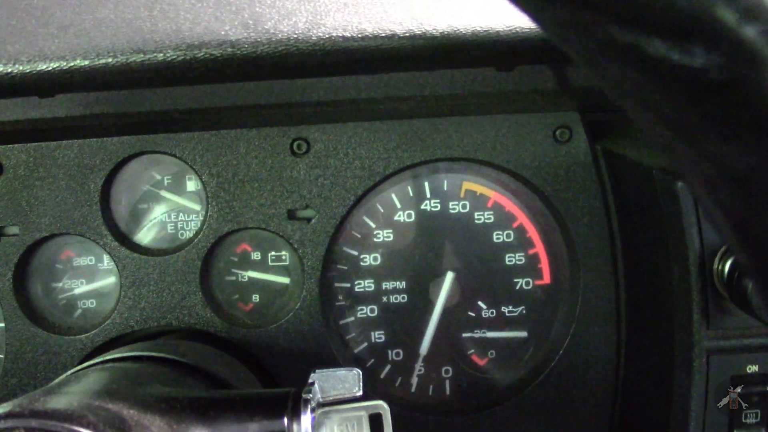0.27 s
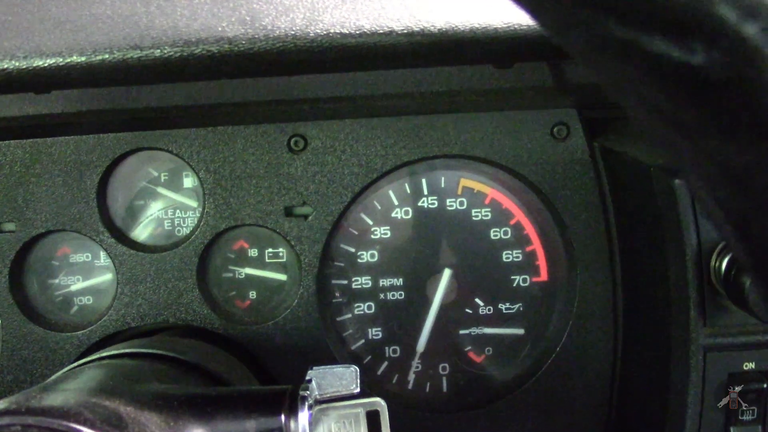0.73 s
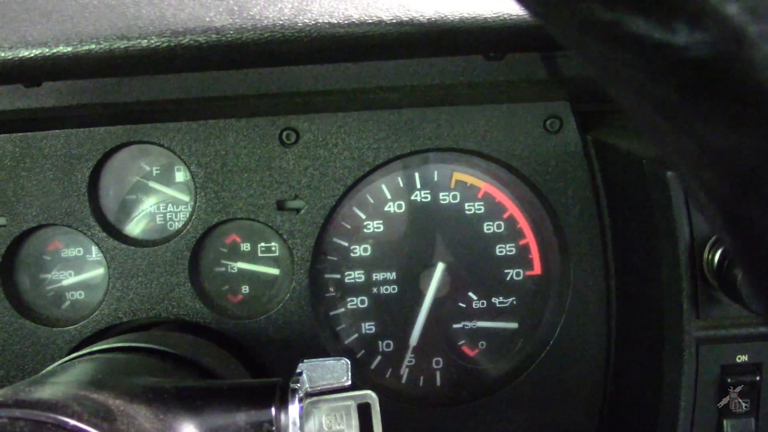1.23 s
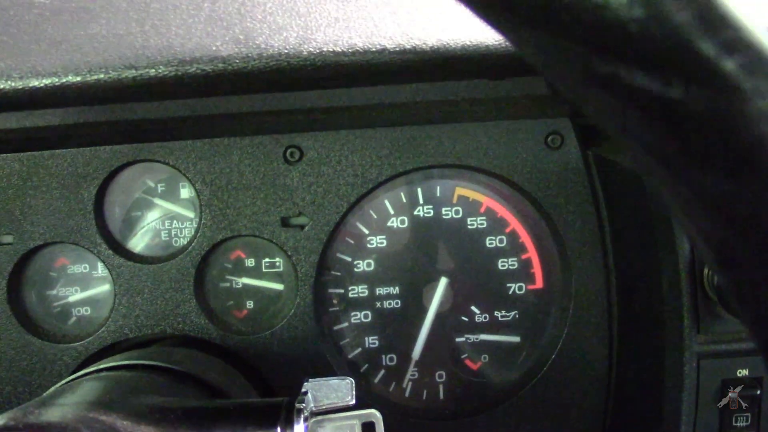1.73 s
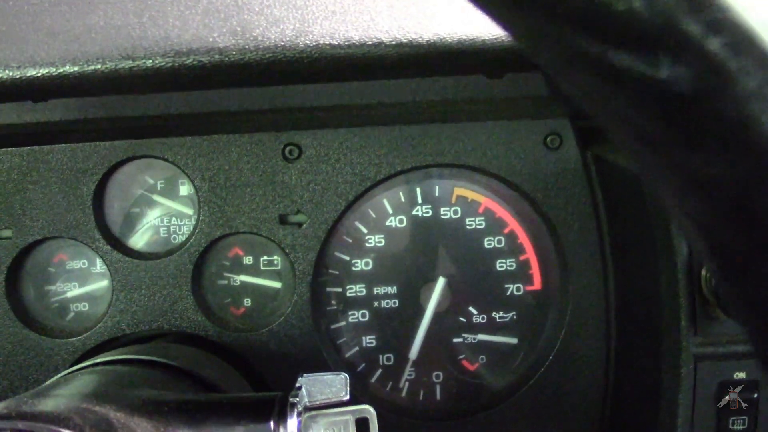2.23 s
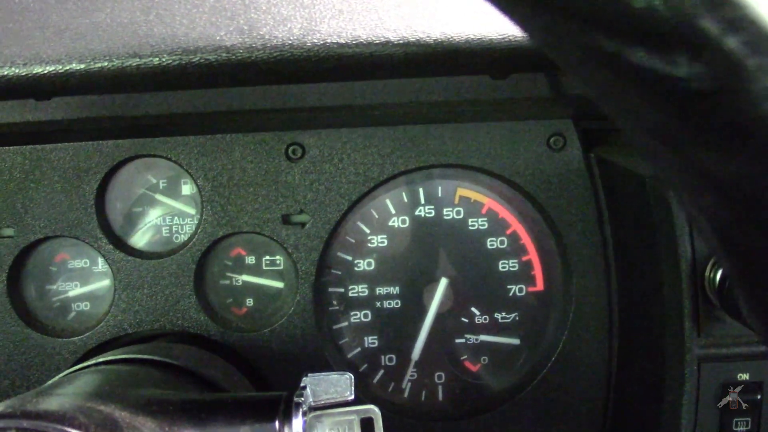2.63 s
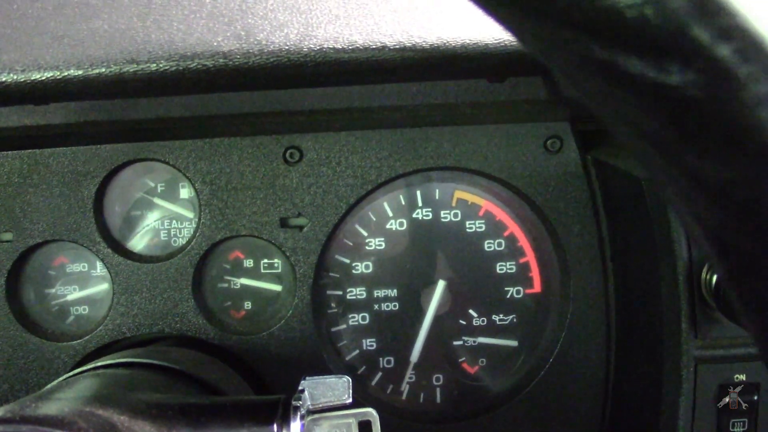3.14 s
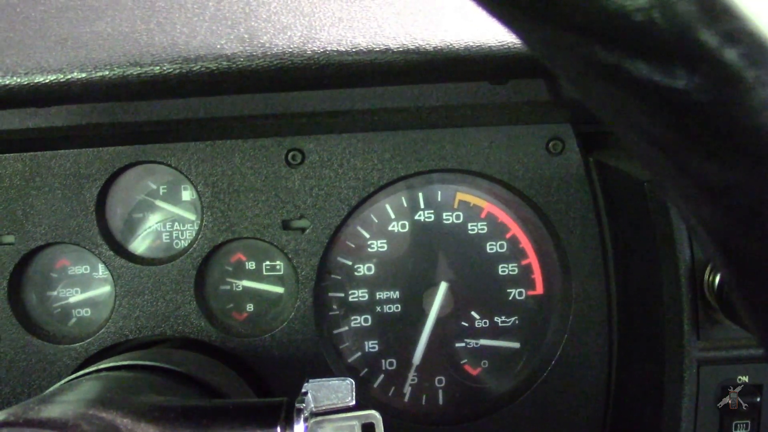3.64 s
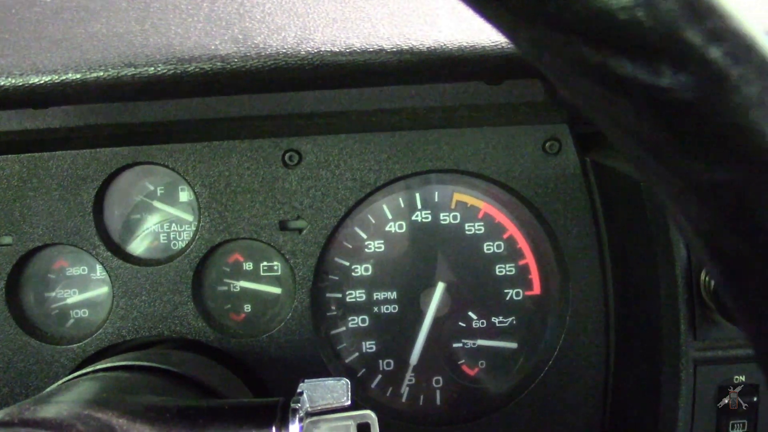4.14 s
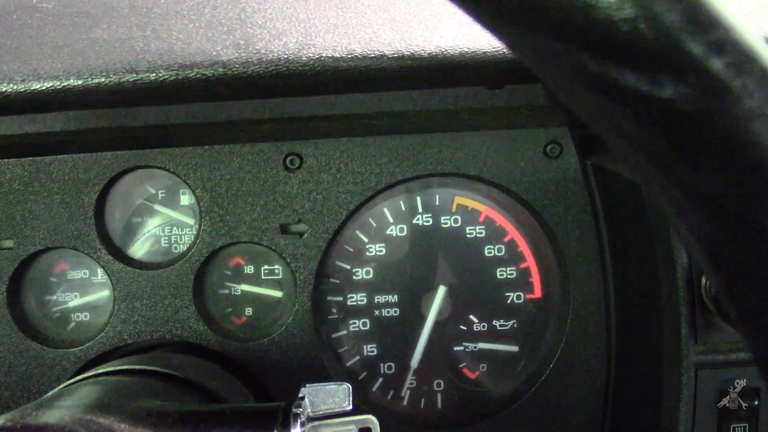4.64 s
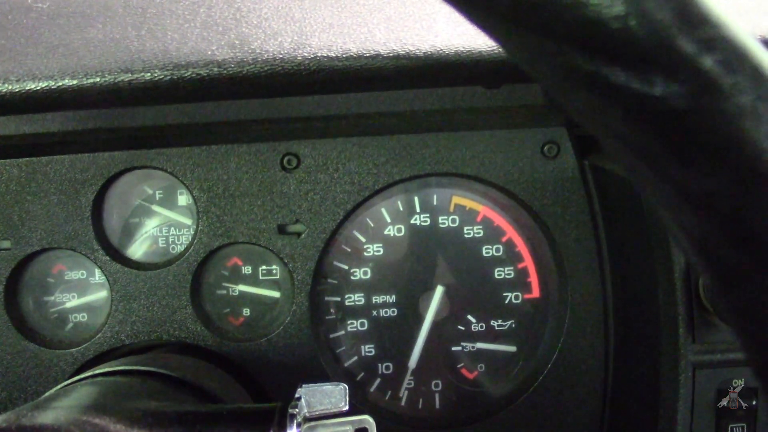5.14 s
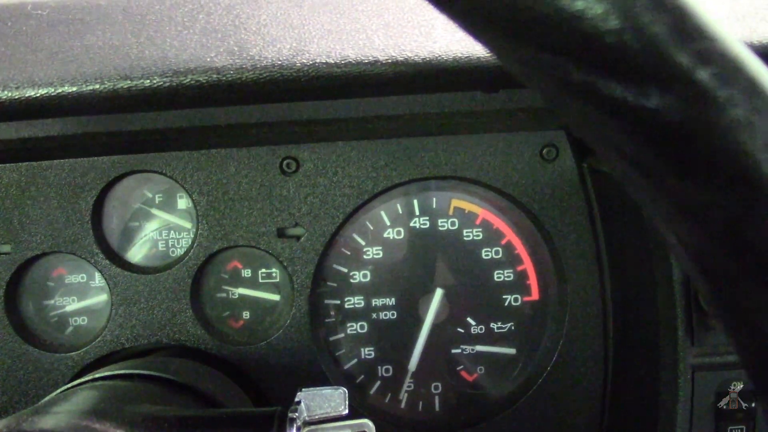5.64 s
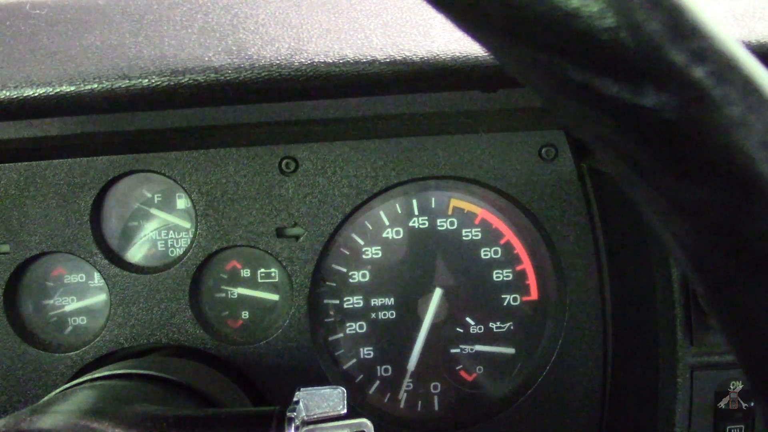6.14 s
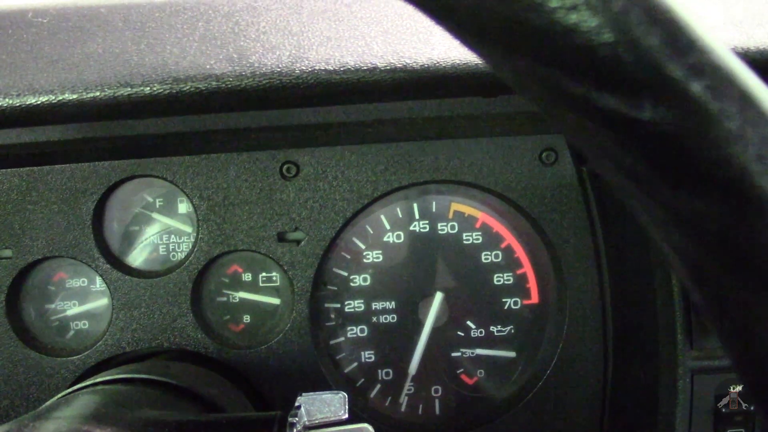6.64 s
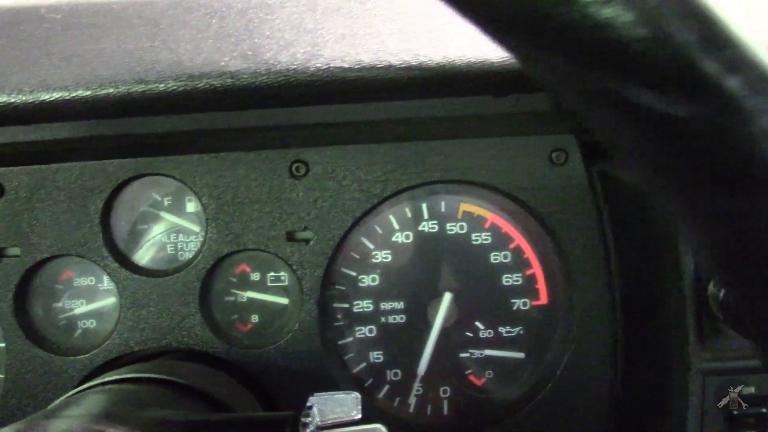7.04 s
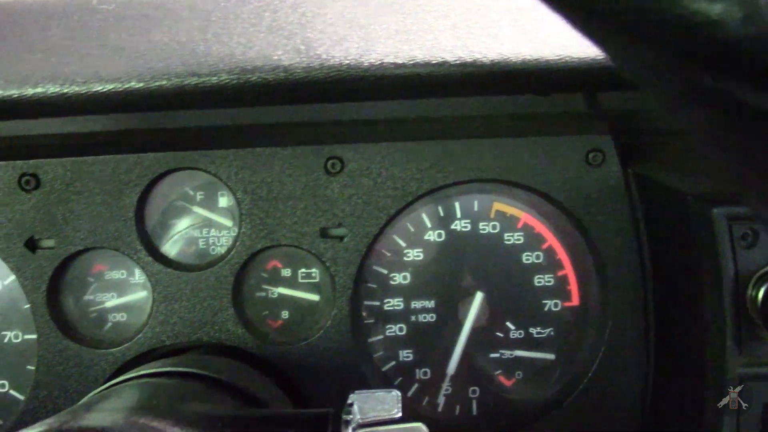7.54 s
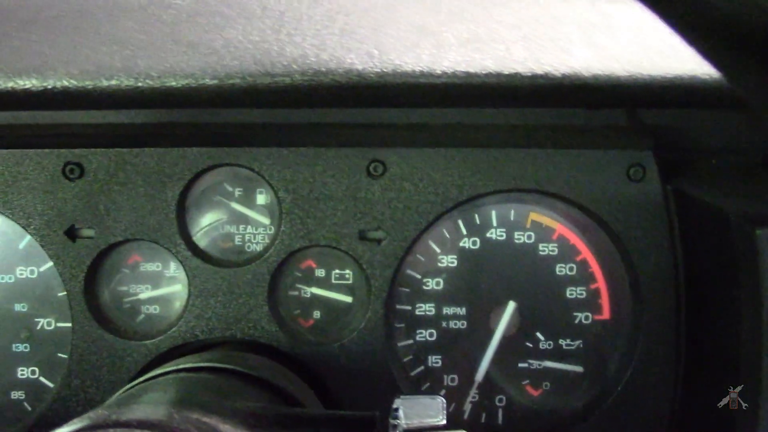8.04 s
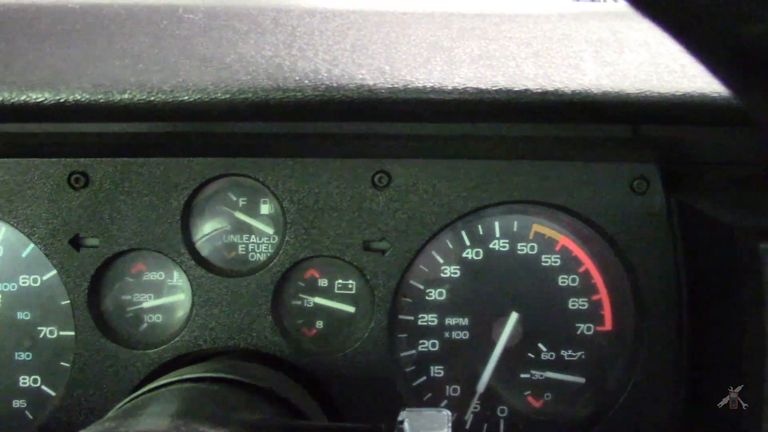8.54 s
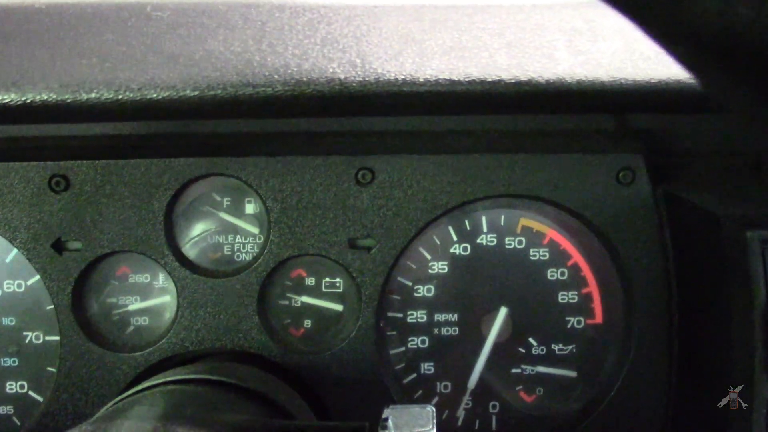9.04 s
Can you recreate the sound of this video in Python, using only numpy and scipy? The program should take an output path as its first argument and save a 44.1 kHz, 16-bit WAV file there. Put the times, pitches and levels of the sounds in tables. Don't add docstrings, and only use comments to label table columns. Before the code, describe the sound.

Inside a parked car, a big V8 idles with a deep, uneven burble and boomy cabin resonance, growing louder over the first few seconds. Around one second a lever scrapes and bangs in a rapid double cluster of hollow knocks. Afterwards the idle wanders slightly, with muffled hiss, faint whine and rasp. Small motor ticks and hand rubs sound close to the little stereo microphone.

```python
import sys
import numpy as np
from scipy import signal
from scipy.fft import rfft, irfft
from scipy.io import wavfile
from scipy.ndimage import uniform_filter1d

SR = 44100
rng = np.random.default_rng(int(sys.argv[2]) if len(sys.argv) > 2 else 0)


def voltage_ratio(decibels):
    exponent = np.asarray(decibels, float) / 20
    return 10 ** exponent


def wrap_up_sound(samples):
    columns = np.atleast_2d(samples).T
    tamed = np.clip(columns, -1, 1)
    steps = np.round(tamed * 32767).astype(np.int16)
    wavfile.write(sys.argv[1], SR, steps)


N = 409248

# time in seconds, firings per second, exhaust level in dB with the gain creep.
IDLE = [(0.0, 39.46, -28.2), (0.5, 38.19, -26.4), (0.72, 39.76, -26.0), (1.87, 42.35, -21.8),
        (2.24, 40.93, -21.1), (2.54, 40.67, -21.3), (3.18, 38.07, -20.1), (3.96, 38.76, -17.9),
        (4.42, 40.91, -17.8), (5.53, 40.08, -18.2), (5.88, 37.92, -18.7), (6.23, 40.72, -18.2),
        (7.02, 38.09, -18.1), (7.38, 38.49, -18.2), (7.85, 41.04, -17.6), (8.56, 41.77, -16.9),
        (8.8, 40.3, -17.3), (9.28, 41.07, -17.2)]
HEADER_MS = [4.62, 3.61, 3.13, 3.8, 4.71, 3.75, 3.72, 4.49]
# frequency in Hz, t60 in seconds, signed push from each of eight cylinders.
EXHAUST_MODES = [(47.8, 0.377, -0.12, 0.34, 0.59, -0.04, 0.66, -0.19, 0.19, 0.37),
                 (62.7, 0.5, -0.12, 0.18, 0.05, -0.4, 0.31, 0.44, 0.16, 0.41),
                 (84.5, 0.236, 0.27, 1.06, -0.2, 0.46, 0.28, -0.63, 1.54, 0.42),
                 (95.0, 0.104, 0.57, -0.62, 0.5, -0.22, -0.46, 0.14, -0.67, -0.3),
                 (122.2, 0.238, 0.06, 0.04, 0.27, -0.12, 0.45, -0.12, 0.3, 0.4),
                 (145.3, 0.175, 1.09, -0.06, -0.01, -0.08, 0.65, -0.78, 0.64, -0.36),
                 (171.8, 0.071, -2.01, -1.29, -4.16, -3.17, -0.43, 0.46, -3.34, -2.54),
                 (180.1, 0.223, -0.81, 1.31, 2.21, 1.47, -0.01, -0.25, 1.27, 1.95)]
# multiple of the firing rate, level in dB re exhaust at slowest idle,
# dB lost per Hz of firing rate, wobble in Hz.
PUMPS = [(7.0, -10.8, 3.2, 4.5), (8.75, -20.5, 1.0, 6)]
# frequency in Hz, level in dB per Hz.
BAY_COLOUR = [(120, -27), (195, -8.5), (230, -17), (275, -9.5), (310, -18), (345, -15), (445, -23.5),
              (520, -15.5), (729, -25.5), (960, -32.5), (1670, -36), (2320, -42.5), (10700, -58.5),
              (15500, -67.5)]
# frequency in Hz, side minus mid in dB.
BAY_WIDTH = [(60, -40), (110, -40), (200, -27), (380, -22), (700, -25.5), (1290, -14.5), (2380, -11.5),
             (4400, -10), (8120, -14), (15000, -12.5)]
# frequency in Hz, width in Hz, lift in dB.
PANELS = [(495.6, 19.4, 9.5), (574, 29, 4.5), (679, 10.6, 6), (850, 114, 9.5), (1068, 37, 6.5),
          (1700, 130, 3), (2810, 410, 3)]
# drone, valve-gear rasp, hiss [dB].
BAY_USUAL_DB = (-29, -47, -62)
BAY_SETTLED_DB = (-29, -49, -63)
BAY_FOLLOWS = (0.89, 0.86, 0.78)
# time in seconds, peak dB, click dB, deep thud dB, hollow ring dB.
KNOCKS = [
    (1.187, -15, -30, 12, -6),
    (1.198, -13.5, -34, -11, -23),
    (1.209, -29, -38, -12, -14),
    (1.276, -10.5, -32, -25, -14),
    (1.288, -18.5, -37, -25, 3),
    (1.302, -17, -40, -22, -7),
    (1.319, -21, -44, -20, 5),
    (1.368, -10.5, -44, -27, -10),
]
# frequency in Hz, level in dB, t60 in seconds.
KNOCK_MODES = [(480, -2, 0.15), (514, 9, 0.017), (584, -8, 0.079), (774, -7, 0.068), (1170, -26, .04)]
# frequency in Hz, width in Hz, level in dB.
SLIDE_MODES = [(2015, 51, 13.5), (2930, 89, 10), (3430, 76, 3.5), (6200, 120, -3), (6900, 150, -14),
               (9100, 250, -13)]
# time in seconds, peak dB.
TICKS = [(1.1315, -46), (1.259, -49), (1.365, -46), (1.42, -49), (1.6347, -47.5), (1.701, -50),
         (1.7649, -48), (1.8194, -53), (4.133, -40), (4.2, -39.5), (4.269, -37.5), (4.339, -38),
         (4.41, -43), (4.4837, -36), (4.6239, -39), (7.2843, -43), (7.3537, -44.5), (7.9096, -44.5),
         (7.9788, -44)]
# time in seconds, peak dB, centre in Hz, width in octaves.
SNAPS = [(1.118, -54, 10500, .8), (1.259, -40, 2000, 1.6), (1.275, -52, 9000, 1.0),
         (1.369, -40, 3300, 0.35), (1.7, -40, 1600, 1.1), (8.838, -42, 9300, .8), (8.853, -36, 6000, .3),
         (8.855, -46, 10500, 1.0), (8.856, -34, 1900, .4), (8.861, -39, 7050, .2), (8.893, -38, 1500, .5)]
# start in seconds, length in seconds, bright dB, dull share dB, squeak share dB.
RUSTLE = [
    (-.05, .14, -52, 2, -13),
    (0.127, .2, -59, 6.5, -21),
    (.9, 0.79, -60, -1, -20),
    (1.62, 0.22, -59, -6, -20),
    (1.793, 0.31, -64, 12.5, -20),
    (3.405, 0.67, -66, 19.5, -20),
    (5.85, 0.39, -67, 17.5, -22),
    (7.15, 0.44, -65.5, 18.5, -20),
    (8.716, .24, -61.5, 13, 7),
    (8.83, 0.069, -60, 12, -4),
]

SETTLED_DB = -18
START_FIRINGS = -.67


def rms_one(x):
    return x / np.sqrt(np.mean(x ** 2) + 1e-20)


def in_time(rows):
    s, *columns = np.transpose(rows)
    return [np.interp(np.arange(N) / SR, s, c) for c in columns]


def at_hz(points, hz):
    point_hz, db = np.transpose(points)
    return np.interp(np.log(hz + 1), np.log(point_hz), db)


def drift(rate_hz):
    r = np.exp(-80 * np.pi * rate_hz / SR)
    slow = signal.lfilter([1], [1, -2 * r, r * r], rng.standard_normal(N // 40 + 2002))[2000:]
    return np.interp(np.arange(N) / 40, np.arange(len(slow)), rms_one(slow))


def ring(clicks, hz, t60):
    r, w = voltage_ratio(-60 / (t60 * SR)), 2 * np.pi * hz / SR
    return signal.lfilter([0, np.sin(w)], [1, -2 * r * np.cos(w), r * r], clicks + 1e-18)


def die_away(clicks, t60):
    return signal.lfilter([1], [1, -voltage_ratio(-60 / (t60 * SR))], clicks + 1e-18)


def band(x, low_hz, high_hz, order=2):
    sos = signal.butter(order, [low_hz, min(high_hz, SR / 2.1)], "band", fs=SR, output="sos")
    return signal.sosfilt(sos, x)


def stroke(start_s, attack_s, hold_s, release_s):
    corners = start_s + np.cumsum([0, attack_s, hold_s, release_s])
    return np.sin(np.pi / 2 * np.interp(np.arange(N) / SR, corners, [0, 1, 1, 0])) ** 2


def exhaust(firing_hz, uneven_db, mode_uneven, jitter_ms):
    run_in = SR // 2
    before = np.arange(-run_in, 0) * firing_hz[0]
    turns = np.r_[before, np.cumsum(firing_hz)] / SR + START_FIRINGS
    count = np.arange(int(turns[0]) + 1, int(turns[-1]))
    cylinder = count % 8
    chance = rng.standard_normal((len(count), 2 + len(EXHAUST_MODES)))
    lag = (np.array(HEADER_MS)[cylinder] + jitter_ms * chance[:, 0]) * SR / 1000
    at = (np.searchsorted(turns, count) + lag).astype(int)
    burn = voltage_ratio(uneven_db * chance[:, 1])
    out = 0
    for k, (hz, t60, *push) in enumerate(EXHAUST_MODES):
        push, clicks = np.array(push), np.zeros(len(turns))
        clicks[at] = burn * (push[cylinder] + mode_uneven * push.std() * chance[:, 2 + k])
        out = out + ring(clicks, hz, t60)
    small_mic = signal.butter(4, 36, "high", fs=SR, output="sos")
    return signal.sosfilt(small_mic, out)[run_in:]


def boom():
    return rms_one(band(rng.standard_normal(N), 150, 192, order=3))


def pumps(firing_hz):
    turns = np.cumsum(firing_hz) / SR
    above = np.maximum(firing_hz - 38.5, 0)
    out = 0
    for multiple, db, slope, wobble_hz in PUMPS:
        level = voltage_ratio(db - slope * above + 1.3 * drift(wobble_hz))
        out = out + level * np.sin(2 * np.pi * multiple * turns + .6 * drift(wobble_hz))
    return np.sqrt(2) * out


def rasp(firing_hz):
    place = (np.cumsum(firing_hz) / SR + START_FIRINGS) % 8
    gate = 0.22 + np.exp(-.5 * ((place - 1.9) / .45) ** 2)
    note_hz, level_db, clump_db = 1700, -34, 1.8
    puff = rms_one(band(rng.standard_normal(N), note_hz / 1.14, note_hz * 1.084))
    return voltage_ratio(level_db + clump_db * drift(3)) * gate * puff


def engine_bay(firing_hz, low_db, mid_db, high_db, flicker_db, throb_db):
    hz = np.arange(N // 2 + 1) * SR / N
    panels_db = sum(db / (1 + (2 * (hz - f) / width) ** 2) for f, width, db in PANELS)
    mid, side = rfft(rng.standard_normal((2, N))) * voltage_ratio(at_hz(BAY_COLOUR, hz) + panels_db)
    side = side * voltage_ratio(at_hz(BAY_WIDTH, hz))
    both = np.array([mid + side, mid - side])
    scale = 1 / irfft(mid * (hz > 300) * (hz < 1000), N).std()
    shared = .5 * drift(3.3) + throb_db * np.sin(np.pi * np.cumsum(firing_hz) / SR)
    low, middle, high = [c - usual for c, usual in zip((low_db, mid_db, high_db), BAY_USUAL_DB)]
    levels = [low, low, (low + middle) / 2, middle, (middle + high) / 2, high, high]
    octave, out = np.clip(np.log2(hz / 250 + 1e-9), 0, 6), 0
    for k, level_db in enumerate(levels):
        part = np.cos(np.pi / 2 * np.clip(octave - k, -1, 1)) ** 2
        gain = voltage_ratio(level_db + flicker_db * (1 - k / 7) * (shared + drift(39)))
        out = out + gain * irfft(both * part, N)
    return voltage_ratio(BAY_USUAL_DB[0]) * scale * out


def knocks():
    s, peak_db, click_db, thud_db, hollow_db = np.transpose(KNOCKS)
    at = (s * SR).astype(int)
    spread = rng.standard_normal((len(s), len(KNOCK_MODES)))
    modes = [(hz, t60, db + 3.0 * spread[:, k]) for k, (hz, db, t60) in enumerate(KNOCK_MODES)]
    modes += [(110, .15, thud_db), (338, .09, hollow_db + 5.5), (362, .14, hollow_db + 5.5)]
    out, click = 0, np.zeros(N)
    for hz, t60, db in modes:
        blow = np.zeros(N)
        blow[at] = voltage_ratio(peak_db + db - 11.5)
        out = out + ring(blow, hz, t60)
    click[at] = voltage_ratio(peak_db + click_db - 1.5)
    padded = signal.butter(2, 900, fs=SR, output="sos")
    click_noise = rms_one(band(rng.standard_normal(N), 900, 5000))
    return signal.sosfilt(padded, out) + die_away(click, .08) * click_noise


def shudder():
    s, peak_db = np.transpose(KNOCKS)[:2]
    blows = np.zeros(N)
    blows[(s * SR).astype(int)] = voltage_ratio(peak_db - 17.5)
    tail = uniform_filter1d(die_away(blows, 0.11), size=150)
    return tail * rms_one(band(rng.standard_normal(N), 290, 810))


def slide():
    grit = rng.standard_normal(N) * voltage_ratio(1.0 * drift(60))
    voice = 0
    for hz, width, db in SLIDE_MODES:
        mode = rms_one(band(grit, hz - 0.63 * width, hz + 0.68 * width, order=1))
        voice = voice + voltage_ratio(db) * np.sqrt(width) * mode
    push = stroke(start_s=0.883, attack_s=.13, hold_s=0.17, release_s=0.14)
    return voltage_ratio(-49) * push * (rms_one(voice) + 0.18 * rms_one(band(grit, 5500, 7300)))


def ticks_and_snaps():
    out, age = np.zeros(N), np.arange(1200) / SR
    shape = (1 - np.exp(-age / 0.0021)) * np.exp(-age / 0.005)
    motor = [(s, db, 5870 * np.exp(.04 * rng.standard_normal()), 0.62) for s, db in TICKS]
    for s, db, hz, octaves in motor + SNAPS:
        grit = rng.standard_normal(len(age))
        reach = 2 ** (np.clip(octaves, .2, 2) / 2)
        burst = rms_one(band(grit, hz / reach, hz * reach))
        burst = burst + .3 * rms_one(band(grit, 2500, 3100)) + .1 * rms_one(band(grit, 7000, 13000))
        start = int(s * SR)
        out[start:start + len(age)] += voltage_ratio(db + 4.5) * shape * burst
    return out


def rustle():
    grit = rng.standard_normal((2, N)) * voltage_ratio(2.9 * drift(80))
    grit = grit + 3.1 * grit.sum(axis=0)
    bright = rms_one(band(grit, 3950, 8500))
    dull = rms_one(band(grit, 1200, 2120))
    squeak = rms_one(band(grit, 3800, 4600))
    out = 0
    for s, length, db, dull_db, squeak_db in RUSTLE:
        spell = stroke(s, length / 4, length / 2, length / 4)
        out = out + spell * voltage_ratio(db) * (bright + voltage_ratio(dull_db) * dull + voltage_ratio(squeak_db) * squeak)
    return out


def whistles(creep_db):
    t = np.arange(N) / SR
    lower_db = -94 + 14.5 * stroke(7.85, .08, 9, 1)
    out = 0
    for hz, db in ((14533, -89), (13692, lower_db)):
        out = out + voltage_ratio(db + creep_db + 3) * np.sin(2 * np.pi * hz * t + drift(15))
    return out


def scene():
    firing_hz, exhaust_db = in_time(IDLE)
    creep_db = exhaust_db - SETTLED_DB
    low_db, mid_db, high_db = [db + share * creep_db for db, share in zip(BAY_SETTLED_DB, BAY_FOLLOWS)]
    pulses = exhaust(firing_hz, uneven_db=1.0, mode_uneven=.15, jitter_ms=.1)
    engine = voltage_ratio(0.8) * pulses + voltage_ratio(-10.5) * boom() + pumps(firing_hz) + rasp(firing_hz)
    lever = knocks() + shudder() + slide()
    centre = voltage_ratio(exhaust_db) * engine + lever + ticks_and_snaps() + whistles(creep_db)
    bay = voltage_ratio(-0.39) * engine_bay(firing_hz, low_db, mid_db, high_db, flicker_db=1.0, throb_db=0.53)
    balance = voltage_ratio(np.array([[.1], [-.1]]))
    return centre * balance + bay + rustle()


def top_cut(x):
    return signal.sosfilt(signal.butter(12, 15630, fs=SR, output="sos"), x)


def record(dry):
    rounded = 1.108 * np.tanh(dry / 1.09)
    bass_cut = signal.butter(4, 29, "high", fs=SR, output="sos")
    return top_cut(signal.sosfilt(bass_cut, rounded))


dry = scene()
out = record(dry)
wrap_up_sound(out)
```